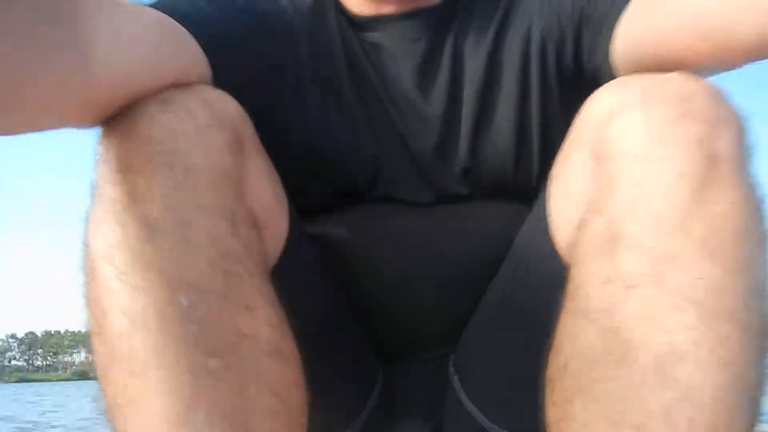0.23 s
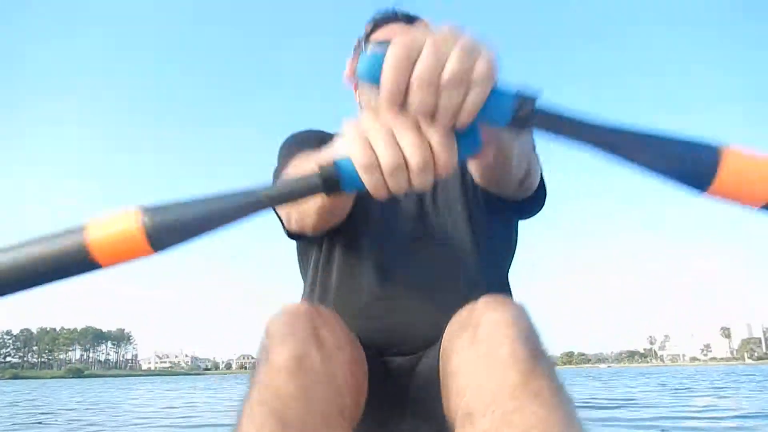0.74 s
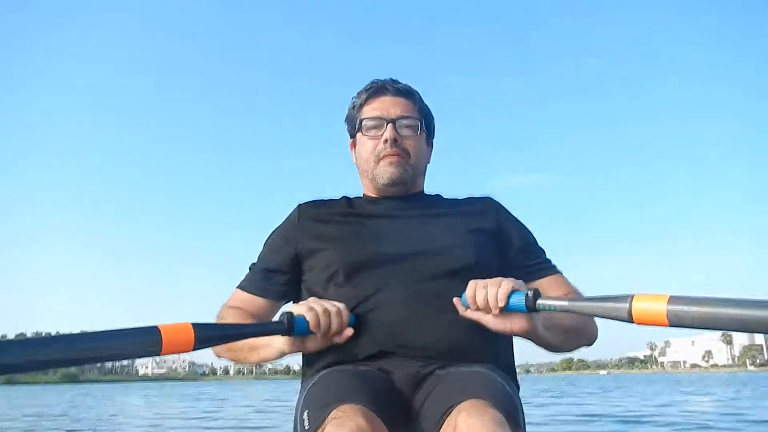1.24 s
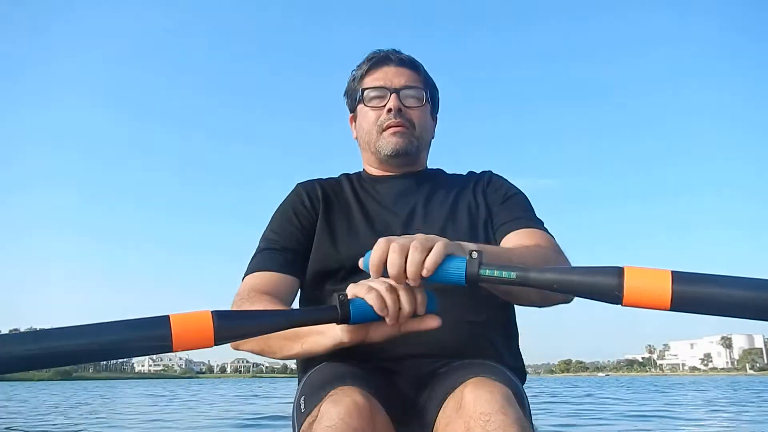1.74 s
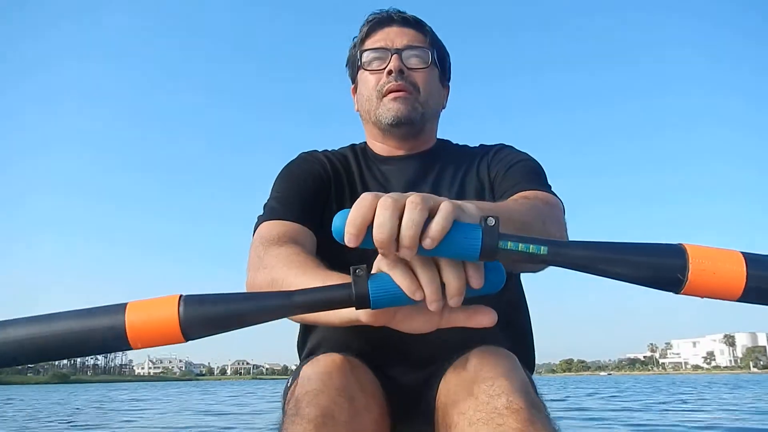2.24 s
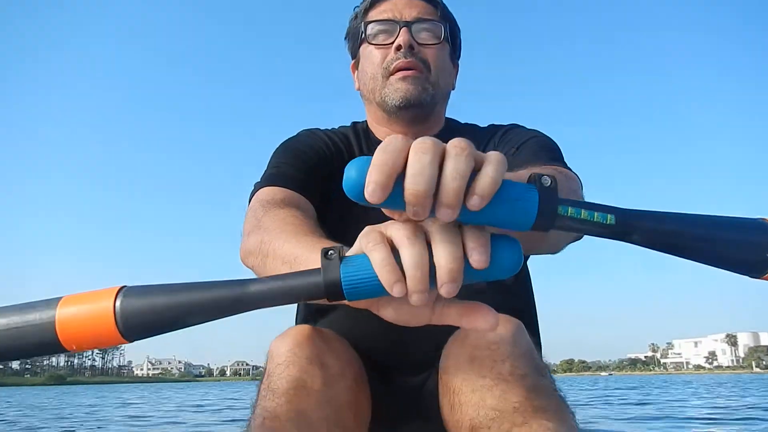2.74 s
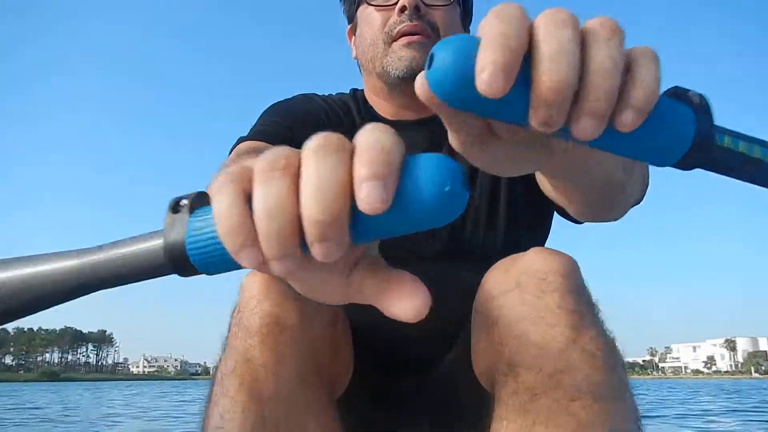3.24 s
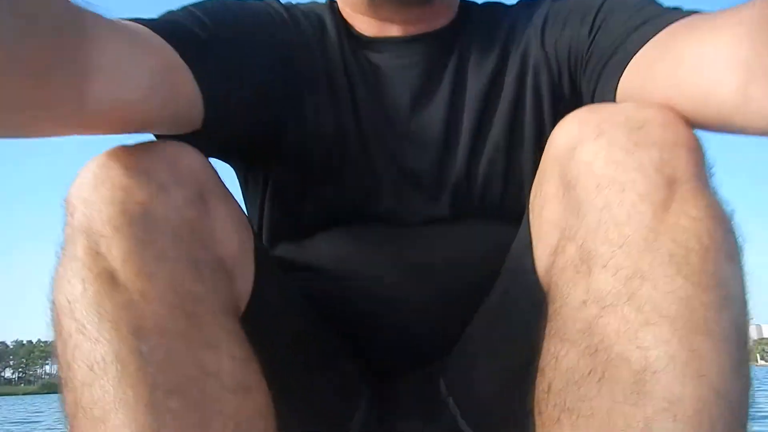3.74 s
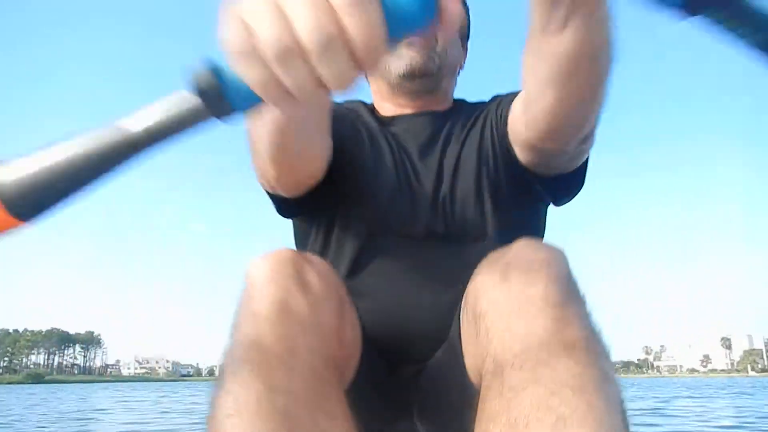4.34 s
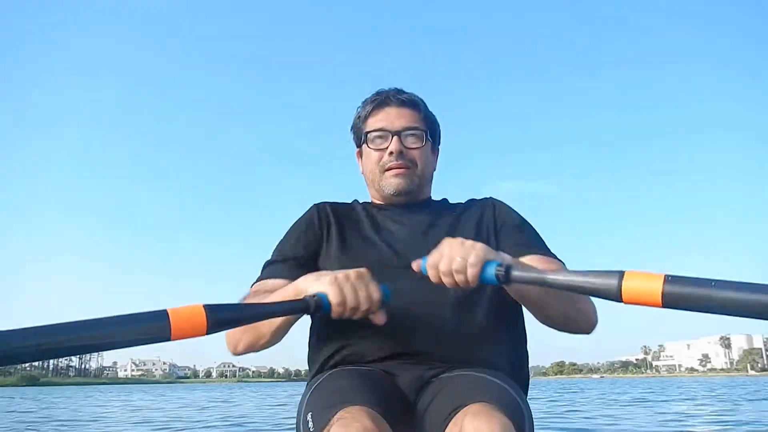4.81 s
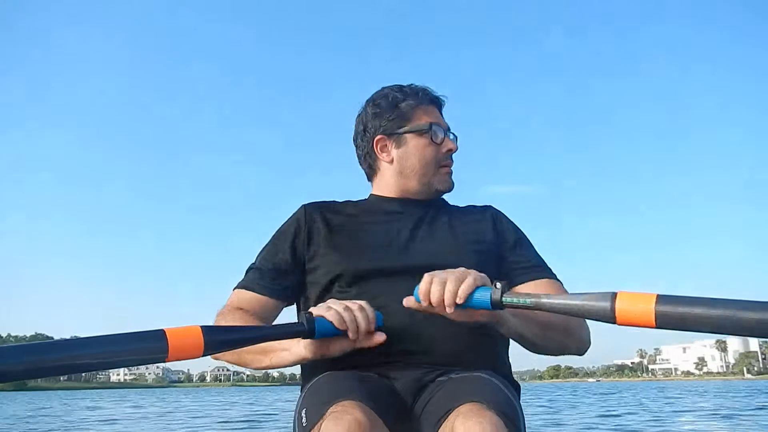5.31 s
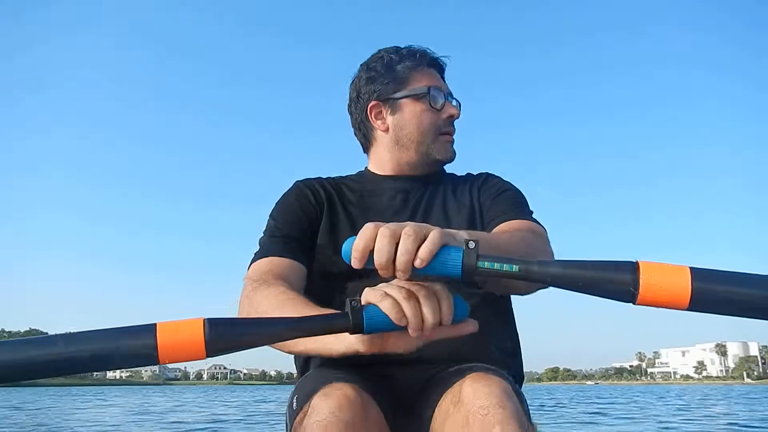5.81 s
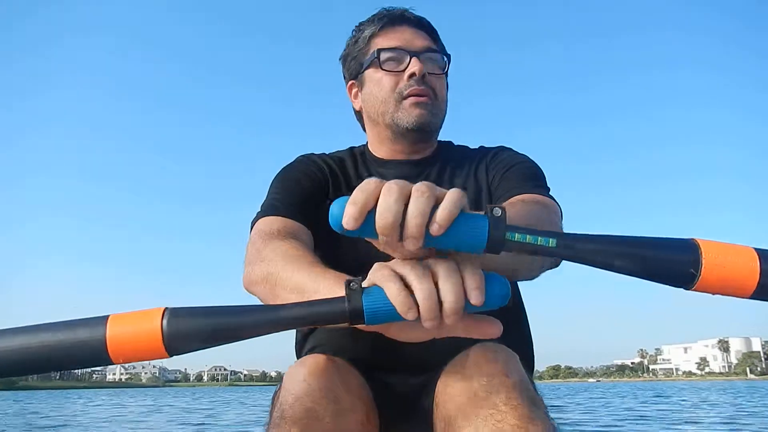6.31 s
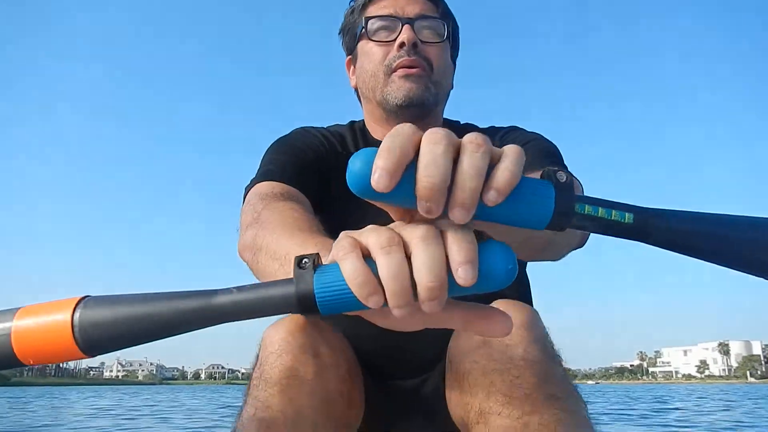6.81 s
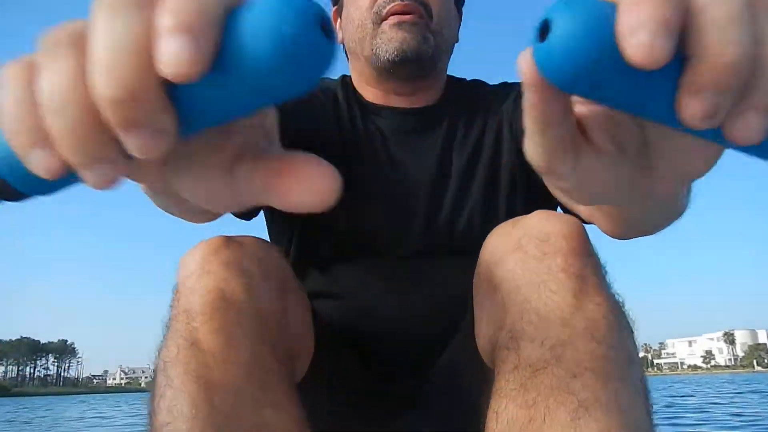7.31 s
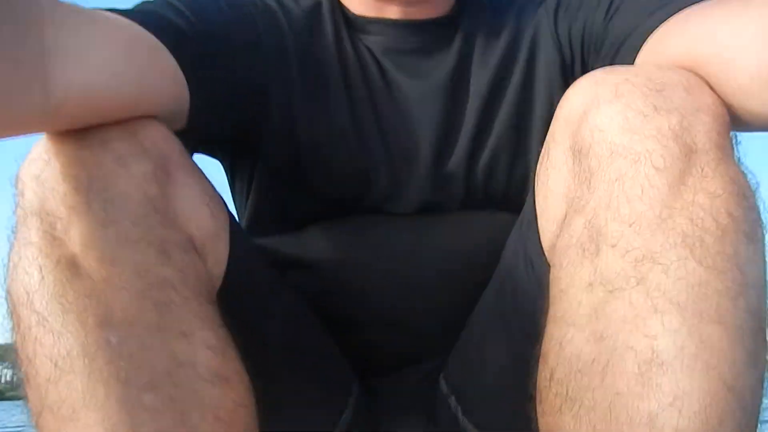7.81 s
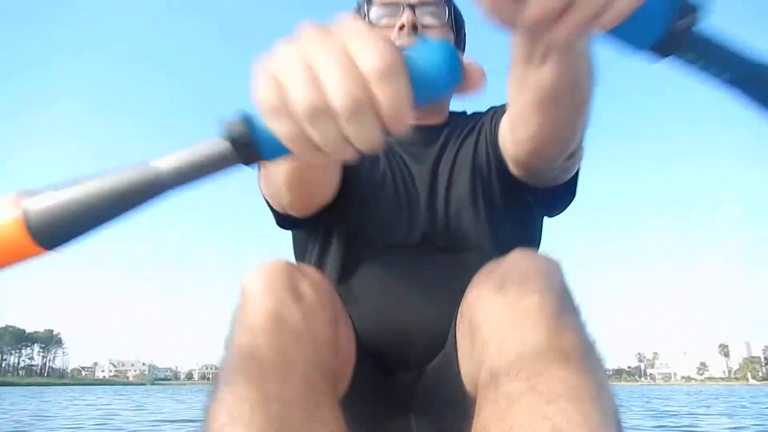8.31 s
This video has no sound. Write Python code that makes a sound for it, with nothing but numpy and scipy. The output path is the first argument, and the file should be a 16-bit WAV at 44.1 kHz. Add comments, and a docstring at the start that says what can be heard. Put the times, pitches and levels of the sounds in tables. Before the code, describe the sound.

Close on-boat rowing: plopping catches, knocking oarlocks, swelling watery wash, low hull gulps, then a quiet glide with light blade hisses.

```python
"""On calm open water, a single scull is rowed, heard from a camera fixed to the hull.
Catches and finishes stir swells of wash: shaped noise and many tiny ringing bubbles.
The blades plop (air pockets that sink in pitch), hiss over or through the water, and drip with short pings.
The hollow hull booms and gurgles as waves slap under it: low wobbling tones with larger gulping bubbles.
The oars scrape and clack in their locks (noise, clicks and ringing tones), with an odd woody tock."""
import sys
import numpy as np
from scipy import signal
from scipy.fft import rfft, irfft
from scipy.io import wavfile

SR = 44100
rng = np.random.default_rng(int(sys.argv[2]) if len(sys.argv) > 2 else 0)


def unload_wav(signal):
    """Save mono or channel-first audio to the path in sys.argv[1] as 16-bit WAV at rate SR, clipped to [-1, 1]."""
    wavfile.write(
        sys.argv[1],
        SR,
        np.round(np.clip(np.atleast_2d(signal).T, -1, 1) * 32767).astype(np.int16),
    )


N = 377055  # length in samples

# Table levels are relative: each layer is also given its own level where it is mixed.


def amp(db):
    """Turns decibels into gain."""
    return 10 ** (np.asarray(db) / 20)


def unit(x):
    """Scales a signal to rms 1."""
    return x / np.sqrt(np.mean(x ** 2) + 1e-20)


def read(points, hz):
    """Reads between the points of a table along a log-frequency axis."""
    f, value = np.transpose(points)
    return np.interp(np.log(hz + 1), np.log(f + 1), value)


def add(mix, s, sound):
    """Mixes in a sound at time s; what falls outside the mix is cut off."""
    at = round(s * SR)
    sound = sound[..., max(-at, 0):]
    part = mix[..., max(at, 0):][..., :sound.shape[-1]]
    part += sound[..., :part.shape[-1]]


def drift(rate_hz, size):
    """Makes a smooth random wander of rms 1 that moves at about the given rate."""
    hz = np.fft.rfftfreq(size, 1 / SR)
    slow = rfft(rng.standard_normal(size)) / (1 + (hz / rate_hz) ** 4)
    return unit(irfft(slow, size))


def colour(x, spectrum, size=4096):
    """Gives a sound the tone of a spectrum, with a causal filter of unit energy."""
    log_gain = np.log(amp(read(spectrum, abs(np.fft.fftfreq(size, 1 / SR)))))
    response = np.exp(np.conj(signal.hilbert(log_gain)))  # the phase that puts the energy early
    taps = np.fft.ifft(response).real[:size // 2]
    return signal.oaconvolve(x, taps[None] / np.linalg.norm(taps), axes=1)[:, :N]


# how alike the noise is at the two microphone ports: f/Hz, likeness (0-1)
LIKENESS = [(30, 0.5), (100, .85), (350, 1), (900, 0.92), (2000, 0.9), (3000, 0.36), (9000, 0.18)]


def grains(clump_db, clump_hz):
    """Clumped noise at two ports, alike in the bass and partly unrelated in the treble."""
    same = np.clip(read(LIKENESS, np.fft.rfftfreq(N, 1 / SR)), -1, 1)
    mid, side = rfft(rng.standard_normal((2, N))) * np.sqrt([1 + same, 1 - same])
    noise = irfft([mid + side, mid - side], N)
    clumps = amp(clump_db * np.minimum(drift(clump_hz, N), 2))
    return unit(noise * clumps)


def burst(t, rise, t60):
    """A soft start and an exponential decay, with peak 1."""
    shape = (1 - np.exp(-(t / rise) ** 2)) * np.exp(-np.log(1000) * t / max(t60, .005))
    return shape / shape.max()


def envelope(times, levels_db, t60s, rise):
    """The joint strength of a row of dying bursts, whose powers add."""
    power, t = np.zeros(N), np.arange(SR // 2) / SR
    for s, db, t60 in zip(times, levels_db, np.broadcast_to(t60s, len(times))):
        add(power, s, (amp(db) * burst(t, rise, t60)) ** 2)
    return np.sqrt(power)


def cavity(hz, t60, rise, bend, settle, rough, rough_hz):
    """A pocket of air rings; its pitch starts off by the share bend and wobbles as its shape changes."""
    t = np.arange(SR // 2) / SR
    wobble = rough * drift(rough_hz, len(t))
    pitch = hz * (1 + bend * np.exp(-t / settle) + wobble)
    return burst(t, rise, t60) * np.sin(2 * np.pi * np.cumsum(pitch) / SR)


def ring(modes, rise, detune):
    """One blow makes a body ring at several pitches, each slightly and randomly off."""
    t = np.arange(SR // 4) / SR
    out = np.zeros(len(t))
    for (hz, db, t60), off in zip(modes, rng.standard_normal(len(modes))):
        tone = np.sin(2 * np.pi * hz * (1 + detune * off) * t)
        out += amp(db) * burst(t, rise, t60) * tone
    return out


def bubbles(per_s, low_hz, high_hz, cycles, spread_db, apart_db, count=24):
    """Small bubbles of many sizes ring briefly at random times, unequally strong on the two sides."""
    out = np.zeros((2, N))
    for hz in np.geomspace(low_hz, high_hz, count):
        age = np.arange(SR // 20) / SR * hz / cycles
        ping = np.sin(2 * np.pi * cycles * age) * age * np.exp(-2 * age)
        at = np.flatnonzero(rng.random(N) < per_s / count / SR)
        shared_db = spread_db * np.minimum(rng.exponential(1, len(at)), 2)
        side_db = apart_db * rng.standard_normal((2, len(at)))
        sizes = np.zeros((2, N))
        sizes[:, at] = amp(shared_db + side_db)
        out += signal.oaconvolve(sizes, ping[None], axes=1)[:, :N]
    return unit(out)


def reflect(x, echo_db, count=7):
    """Deck, rigger and rower throw back a few very short echoes, different at each port."""
    out = x.copy()
    for side in range(2):
        delays_s = rng.uniform(0.00074, 0.0099, count)
        for delay, sign in zip(delays_s, rng.choice([-1, 1], count)):
            add(out[side], delay, sign * amp(echo_db) * x[side])
    return out


# the blades go in: t/s, run-in level/dB (how fast the hull runs), drive level/dB (how hard the pull)
CATCHES = [(0.035, 4, -0.5), (3.812, -1, -12.5), (7.775, -0.5, -2)]
# the blades come out: t/s, release level/dB (how hard they boil up), settle level/dB (the hull sinking)
FINISHES = [(1.223, -0.5, -4.5), (5.019, 0, -2)]
# Four swells of wash, each one row: peak after its cue t/s, rise (dB/s), fall (dB/s),
# gurgle level/dB, churn level/dB, spray level/dB, rumble level/dB
RUN_IN = (0.12, 21, 203, -26.5, -33.5, -42, -29.5)  # the hull runs faster as the rower slides up to the catch
DRIVE = (0.68, 55, 48.5, -30, -34, -49, -57)  # after the catch the blades pull
RELEASE = (0.1248, 31, 35, -26, -27.5, -39, -34)  # the blades boil up to the surface at the finish
SETTLE = (1.13, 5, 52, -37.5, -40, -49, -35)  # after the finish the hull sinks back
# the quiet glide under them: gurgle level/dB, churn level/dB, spray level/dB, rumble level/dB
GLIDE = (-49, -49.5, -61.5, -43)


def stroke_swells(t):
    """Strength of gurgle, churn, spray and rumble: the swells of all strokes on top of the glide."""
    power = amp(GLIDE)[:, None] ** 2 * np.ones(len(t))
    for cues, leading, following in ((CATCHES, RUN_IN, DRIVE), (FINISHES, RELEASE, SETTLE)):
        for cue, leading_db, following_db in cues:
            for swell, db in ((leading, leading_db), (following, following_db)):
                delay, rise, fall, *levels_db = swell
                age = t - cue - delay
                shape_db = np.minimum(rise * age, -fall * age)
                power += np.outer(amp(levels_db), amp(db + shape_db)) ** 2
    return np.sqrt(power)


# tone of the rumbling shell: f/Hz, level/dB
RUMBLE = [(20, -29), (50, -12.5), (78, -5), (98, 1), (120, -4.5), (165, -7), (230, -14.5), (500, -51.5),
          (2000, -56.5)]
# tone of gurgling water: f/Hz, level/dB
GURGLE = [(100, -21.5), (250, -24), (345, 1), (460, 0), (580, -15), (900, -19.5), (3000, -74)]
# tone of churning or torn water, also used by blades(): f/Hz, level/dB
CHURN = [(250, -10.5), (550, -1.5), (800, -1.5), (1150, 0.5), (1450, -4), (2000, -5.5), (3000, -11),
         (6000, -23.5), (9000, -86)]
# tone of fine spray, also used by blades(): f/Hz, level/dB
SPRAY = [(700, -18.5), (1800, 2), (2800, -7), (3700, 4), (5200, 0), (6300, -4), (7400, -20.5), (10000, -26),
         (15000, -28.5)]


def water():
    """Water along the boat: rumble of the shell, gurgle, churning bubbles and fine spray."""
    gurgle, churn, spray, rumble = stroke_swells(np.arange(N) / SR)
    lapping = amp(1.5 * drift(rate_hz=35, size=N))  # ripples make churn and spray noise surge together
    out = amp(2.5) * colour(rumble * grains(clump_db=3.5, clump_hz=22), RUMBLE)
    out += amp(-1.0) * colour(gurgle * grains(clump_db=2.0, clump_hz=44.7), GURGLE)
    out += amp(-4.0) * colour(lapping * churn * grains(clump_db=1.5, clump_hz=90), CHURN)
    out += amp(-0.5) * colour(lapping * spray * grains(clump_db=3.5, clump_hz=178), SPRAY)
    # bubbles follow the same swells: middling in the churn, low in the gurgle, high in the spray
    wet = bubbles(per_s=300, low_hz=550, high_hz=1800, cycles=5, spread_db=3.5, apart_db=2)
    out += amp(-5.0) * churn * wet
    deep = bubbles(per_s=30, low_hz=300, high_hz=529, cycles=4.5, spread_db=1.0, apart_db=2.5)
    out += amp(-6) * gurgle * deep
    fizz = bubbles(per_s=160, low_hz=2400, high_hz=5700, cycles=11, spread_db=8, apart_db=2)
    return out + amp(-4.0) * spray * fizz


def hiss():
    """Faint steady hiss of the microphones: noise that is unrelated on the two sides."""
    noise = rng.standard_normal((2, N))
    return amp(-69.5) * colour(noise, [(100, -11), (9000, 2), (13500, -5), (16000, -11)])


# a blade hisses over or through the water, from a short skim to a longer wash:
# t/s, spray level/dB, torn-water level/dB, time to fall 60 dB (t60/s)
BLADE_HISSES = [(0.016, -30, -19.5, 0.27), (0.289, -28, -29, 0.29), (0.44, -34.5, -30, 0.61),
                (1.627, -30, -31.5, 0.86), (1.718, -26, -23, .16), (1.8, -24, -21, 0.12),
                (1.846, -29.5, -29, 0.58), (2.534, -22.5, -37, 0.079), (2.578, -24.5, -30, 0.16),
                (2.789, -19, -24, 0.16), (3.049, -27, -40, 0.23), (3.112, -25, -42, 0.09),
                (3.152, -27.5, -46, 0.24), (3.209, -33.5, -48, 0.72), (3.42, -28, -36, 0.05),
                (3.467, -26, -55, 0.11), (3.538, -24.5, -38, 0.12), (3.571, -25, -37, 0.14),
                (3.719, -21, -49, 0.12), (4.104, -26, -23.5, 0.18), (4.25, -40.5, -32, 0.38),
                (5.223, -21.5, -42, 0.065), (5.766, -30, -31.5, 0.24), (6.158, -22, -24, 0.13),
                (6.491, -24, -37, 0.047), (6.654, -22, -24, 0.096), (7.21, -19, -45, 0.098),
                (7.478, -21.5, -24, 0.26), (7.755, -32, -28, 0.15), (8.189, -36, -27.5, 0.64)]
# a blade slaps the water and shuts a pocket of air; plops() plays the pockets, blades() the splash:
# t/s, plop level/dB, starting f/Hz, left minus right level/dB, spray level/dB, lesser bubbles level/dB
PLOPS = [(0.032, -4, 993, -2, -26, -20), (0.047, -4.5, 797, -1, -26, -22), (0.066, -15, 830, -6, -39, -21),
         (0.099, -7.5, 715, -5, -22.5, -26), (0.123, -13, 807, -5, -37, -29),
         (0.16, -17.5, 826, -11, -47, -29), (1.005, -20, 716, 3, -37, -26), (1.026, -13, 1110, 1, -42, -26),
         (1.124, -13.5, 946, -3, -22.5, -18), (1.224, -4, 1130, -7.5, -20, -26),
         (1.33, -9, 903, -3.5, -42, -29), (1.553, -19.5, 915, 2, -33, -39),
         (3.812, -4, 843, -4, -27.5, -30), (3.832, -9, 850, 9, -19, -24),
         (3.8545, -10, 800, -4, -26.5, -28), (3.914, -11, 780, -4, -27, -24),
         (3.943, -16, 917, -1, -29, -38), (3.966, -21.5, 770, -4, -40, -47),
         (4.021, -13.5, 788, -4, -41, -35), (4.084, -24, 1190, 2, -53, -24),
         (4.847, -20.5, 1110, 2, -36, -26.5), (4.906, -19, 800, -10, -26, -22),
         (4.946, -27, 1000, -2, -26.5, -27), (5.019, -6.5, 927, -3.5, -23.5, -38),
         (5.134, -22, 710, -5, -34, -44), (5.246, -20, 850, -4, -41, -46), (5.35, -19.5, 800, 0, -24, -30),
         (5.724, -21.5, 1018, 2, -31.5, -39), (5.919, -18, 930, -1, -19, -28),
         (7.7763, -1.5, 1000, -3.5, -28.5, -40), (7.835, -11.5, 760, -5, -26.5, -39),
         (7.858, -18.5, 713, -5, -36, -40), (8.016, -22, 785, -4, -31, -31)]


def blades():
    """A blade grazes the water, smacks it, and throws hissing spray and pinging droplets over torn water."""
    splash_t60, torn_db = 0.15, -2  # (s), (dB relative to the mean of plop and spray levels)
    slaps = [(s, spray_db, (plop_db + spray_db) / 2 + torn_db, splash_t60)
             for s, plop_db, _, _, spray_db, _ in PLOPS]
    s, spray_db, torn_levels_db, t60s = np.transpose(slaps + BLADE_HISSES)
    fine = colour(grains(clump_db=5.5, clump_hz=350), SPRAY)
    droplets = bubbles(per_s=370, low_hz=2297, high_hz=6090, cycles=10.0, spread_db=2.5, apart_db=8)
    spray = amp(-1.0) * fine + amp(-5.0) * droplets
    thrown = envelope(s, spray_db, t60s, rise=0.00081)
    t = np.arange(SR // 4) / SR
    graze = amp(-7.5) * burst(t, 0.0006, t60=0.086)[::-1]  # grows up to the smack
    contact = np.zeros((2, N))
    for start, db in zip(s, spray_db):
        add(thrown, start - t[-1], amp(db) * graze)
        contact[:, round((start + .002) * SR)] = amp(db + 15.5)  # the flat of the blade meets the water
    smack = amp(1.0) * envelope(s, torn_levels_db, t60s=0.014, rise=0.00034)
    tearing = envelope(s, torn_levels_db, t60s, rise=0.0026)
    torn = colour(grains(clump_db=3.0, clump_hz=195) * (smack + tearing), CHURN)
    splash = reflect(spray * thrown + colour(contact, SPRAY), echo_db=-11.5)
    return amp(-8.5) * splash + amp(-5.0) * torn


def pocket(hz):
    """A shut pocket of air starts bright and drops in pitch as it spreads; its upper tone dies first."""
    low_hz, sink_s = 450, 0.01045  # the pitch it drops to (Hz), and how soon (s)
    t60 = 61 / hz  # it dies away in 61 cycles of its starting pitch
    t = np.arange(SR // 8) / SR
    falling = low_hz + (hz - low_hz) * np.exp(-(t / sink_s) ** 3)
    pitch = falling * (1 + 0.072 * drift(340, len(t)))
    turns = 2 * np.pi * np.cumsum(pitch) / SR
    main = burst(t, 0.0012, t60) * np.sin(turns)
    upper = burst(t, 0.00089, t60 / 2) * np.sin(1.3 * turns)
    return main + amp(-8.5) * upper


# a wave meets the hollow hull, which booms, while a large bubble gulps beside it;
# hull() plays the booms, and shell() rings with the gulps:
# t/s, boom level/dB, boom f/Hz, gulp level/dB
WAVES = [(0.036, -10.5, 92.8, -5), (0.112, -20, 179, -6.5), (0.147, -21.5, 160.6, -9.5),
         (0.298, -21, 90, -16), (1.006, -23.5, 132, -11), (1.123, -12, 128, -12.5), (1.252, -5, 92, -4.5),
         (1.364, -10.5, 102.6, -12.5), (1.436, -18, 98.3, -19), (1.619, -16, 110, -23),
         (1.684, -16, 112.2, -14.5), (1.74, -15, 91.4, -17), (1.839, -13.5, 99, -18.5),
         (1.984, -24.5, 115.5, -46), (2.788, -21, 105.3, -26), (2.856, -25.5, 127.4, -23.5),
         (2.923, -18.5, 145, -18.5), (3.291, -27, 92, -38), (3.606, -31, 92, -18.5), (3.818, -9, 104, -8),
         (3.88, -13.5, 159, -9.5), (3.961, -15.5, 100, -14.5), (4.059, -14.5, 103.5, -20),
         (4.9, -12, 138.2, -5.5), (4.972, -21, 126, -12.5), (5.027, -3, 96, -3), (5.106, -29, 123, -11),
         (5.14, -16, 113.3, -4.5), (5.25, -10, 100, -22), (5.35, -17.5, 111.4, -17),
         (5.612, -16, 108.5, -26.5), (5.729, -19.5, 104, -21.5), (5.934, -15.5, 92, -19),
         (6.173, -23.5, 147, -18.5), (6.211, -25, 109.6, -17.5), (6.669, -20, 106.4, -29),
         (7.394, -20, 150.6, -40), (7.476, -14.5, 105.4, -27), (7.664, -18, 91.2, -9.5),
         (7.787, -17, 162.6, -11), (7.85, -19.5, 125, -15), (8.03, -18, 93.5, -17), (8.37, -31, 116.5, -28)]


def plops():
    """Slaps close small air pockets, which sink in pitch; waves shut larger ones that gulp lower and longer."""
    small, large = np.zeros((2, N)), np.zeros(N)
    for s, db, hz, pan_db, *_ in PLOPS:
        place = amp([[db + pan_db / 2], [db - pan_db / 2]])
        add(small, s, place * pocket(hz))
    for s, _, _, db in WAVES:
        gulp = cavity(364.5, t60=0.12, rise=0.0017, bend=0.1, settle=0.0067, rough=0.13, rough_hz=126)
        add(large, s, amp(db) * gulp)
    # each slap breaks up into a short cloud of lesser bubbles
    s, *_, db = np.transpose(PLOPS)
    cloud = bubbles(per_s=400, low_hz=393, high_hz=1394, cycles=3.0, spread_db=2, apart_db=2.5)
    cloud *= envelope(s, db, t60s=0.21, rise=0.014)
    return amp(-4.5) * reflect(small, echo_db=-15.5) + amp(-4.5) * large + amp(-2.5) * cloud


def hull():
    """A wave under the shell gives a low boom with a shorter overtone, choked as the water closes again."""
    out, t = np.zeros((2, N)), np.arange(SR // 2) / SR
    t60 = 0.62  # how long the boom would ring without the choke (s)
    choke = np.exp(-(t / 0.11) ** 3)
    for (s, db, hz, _), lean_db in zip(WAVES, rng.normal(0, 2.2, len(WAVES))):
        boom = cavity(hz, t60, rise=0.0028, bend=0.13, settle=0.0055, rough=0.074, rough_hz=40.7)
        overtone = cavity(hz * 1.7, t60 / 2, rise=0.0083, bend=0.24, settle=0.0067, rough=0.15, rough_hz=66.6)
        place = amp([[db + lean_db], [db - lean_db]])
        add(out, s, place * choke * (boom + amp(-11.0) * overtone))
    return amp(-3.5) * out


# ringing tones of rigger and hull, also used by oarlocks(): f/Hz, level/dB, time to fall 60 dB (t60/s)
RIGGER = [(367.5, -2, 0.14), (455, -2.5, 0.09), (543, -12, 0.15), (861, -12, 0.048)]


def shell():
    """Waves reach the thin hull about 4 ms after their gulps begin and leave it ringing."""
    out = np.zeros(N)
    for s, _, _, db in WAVES:
        add(out, s + 0.00399, amp(db - 13.5) * ring(RIGGER, rise=0.0052, detune=0.045))
    return out


# a drop from a blade pings on the water: t/s, level/dB, f/Hz
DRIPS = [(0.1, -17.5, 4080), (0.474, -29, 3800), (1.074, -24, 1960), (1.152, -21, 3530), (1.241, -24, 5200),
         (1.271, -25, 2100), (1.85, -22, 3610), (3.052, -21.5, 3410), (3.127, -25, 3940),
         (3.326, -30, 5000), (3.544, -24.5, 2060), (5.036, -19, 2130), (5.16, -21.5, 1910),
         (5.184, -23, 4920), (6.497, -26.5, 2100), (7.787, -25, 2100)]


def drips():
    """Drops run off the blades; each traps a tiny bubble whose pitch rises as it surfaces."""
    out = np.zeros((2, N))
    for (s, db, hz), lean_db in zip(DRIPS, rng.normal(0, 3.0, len(DRIPS))):
        ping = cavity(hz, t60=0.018, rise=0.00059, bend=-0.052, settle=0.0031, rough=0.11, rough_hz=1500)
        add(out, s, amp([[db + lean_db], [db - lean_db]]) * ping)
    return amp(0.5) * reflect(out, echo_db=-12.5)


# an oar knocks in its lock: t/s, clack level/dB, rigger and hull ring level/dB
KNOCKS = [(0.3968, -6.5, -11), (0.4006, -11, -13), (0.4086, -11.5, -10), (0.4164, -14.5, -16),
          (0.6595, -27, -22), (0.6924, -16.5, -24), (0.8843, -26, -21), (1.3963, -10, -32),
          (2.086, -18, -16), (2.1305, -19, -20), (2.167, -54, -23.5), (2.211, -25.5, -20),
          (2.922, -32, -31), (4.1968, -7.5, -11), (4.2084, -12, -12.5), (4.2193, -21, -24),
          (4.4138, -18, -35), (4.4378, -20.5, -17.5), (4.745, -33, -15), (6.012, -33, -24),
          (6.083, -35, -25.5), (6.167, -12, -44), (6.866, -35, -23.5), (8.1178, -7, -8.5),
          (8.1426, -10.5, -9), (8.1519, -15.5, -19), (8.175, -16.5, -11.5), (8.2811, -25, -15.5),
          (8.294, -9, -15)]
# ringing tones of the hollow oar shaft and its lock: f/Hz, level/dB, time to fall 60 dB (t60/s)
OAR = [(1255, 1, 0.077), (1630, -6.5, 0.14), (1882, -2.5, 0.072), (2837, -5, 0.067), (3880, -3.5, 0.045),
       (4590, -8, 0.055), (4760, -8, .06), (5300, -12, 0.06)]
# tone of a clack, also used by tocks(): f/Hz, level/dB
CLACK = [(150, -27.5), (400, 10.5), (900, -2.5), (1900, -0.5), (2400, -3.5), (2850, -3), (3450, -6),
         (3900, -7), (5300, -9), (6300, -17.5), (7500, -29), (15000, -37)]


def oarlocks(count=4):
    """The sleeve scrapes as the oar turns, falls flat and bounces unevenly; shaft and rigger ring."""
    s, clack_db, ring_db = np.transpose(KNOCKS)
    # heavier blows on the rigger rattle longer: 0.066 s at 0 dB, halved for every 33 dB less
    t60s = 0.066 * 2 ** (ring_db / 33)
    rebound_s = .002  # typical time between bounces
    force = envelope(s, clack_db, t60s, rise=0.00049)
    rigger, contact, shaft = np.zeros(N), np.zeros(N), np.zeros((2, N))
    t = np.arange(SR // 4) / SR
    scrape = amp(-13.5) * burst(t, 0.00042, t60=0.13)[::-1]  # grows up to the blow
    for start, clack, db, t60 in zip(s, clack_db, ring_db, t60s):
        add(force, start - t[-1], amp(clack) * scrape)
        add(rigger, start, amp(db) * ring(RIGGER, rise=0.0011, detune=0.024))
        both_sides = np.array([ring(OAR, rise=0.0005, detune=0.011) for _ in range(2)])
        add(shaft, start, amp(clack) * both_sides)
        add(contact, start, amp([clack]))  # the first hard touch
        for age in np.cumsum(rebound_s * (.5 + rng.random(count))):
            fade = np.exp(-np.log(1000) * age / max(t60, .005))
            add(contact, start + age, amp([clack]) * fade * rng.uniform(-1.3, 1))
    rattle = colour(amp(18.0) * contact + grains(clump_db=1.0, clump_hz=473) * force, CLACK)
    return reflect(amp(-8.0) * rattle, echo_db=-20) + amp(-13) * shaft + amp(-1.5) * rigger


# something hard and hollow is tapped in the boat: t/s, level/dB, f/Hz
TOCKS = [(4.746, -21, 1310), (5.414, -19, 1266), (5.98, -9, 1046)]


def tocks():
    """A dry click sets off a short, hollow, woody tone with a weaker one above it."""
    tone, click, t = np.zeros(N), np.zeros((2, N)), np.arange(SR // 4) / SR
    for s, db, hz in TOCKS:
        turns = 2 * np.pi * hz * t
        tones = np.sin(turns) + amp(-10) * np.sin(1.59 * turns)
        add(tone, s, amp(db) * burst(t, 0.00066, t60=0.028) * tones)
        add(click, s, amp([db + 9.5]))
    return tone + reflect(colour(click, CLACK), echo_db=-7.5)


def scene():
    """Open water adds no echo of its own: all sources are simply summed."""
    return water() + hiss() + blades() + plops() + hull() + shell() + drips() + oarlocks() + tocks()


# tilt between the two microphone ports: f/Hz, left minus right level/dB
PORT_TILT = [(30, 9), (100, -2), (550, -0.5), (790, -5.5), (1150, 1.5), (2200, -1.5), (2850, -4),
             (3550, 4.5), (4250, -3.5), (5500, -1.5), (8500, -2.5), (12000, 0.5)]
# dead spots of the camera's microphone: f/Hz, width (Hz)
NOTCHES = [(2500, 114), (3210, 360), (5005, 3.5)]


def record(dry):
    """The camera's two ports colour and delay the sound differently; then its notches and treble limit."""
    hz = np.fft.rfftfreq(N, 1 / SR)
    right_lag, low_cut_hz, treble_limit_hz = .00003, 52, 15750  # (s, Hz, Hz)
    # half of the tilt and of the lag goes to each port, in opposite directions
    port = amp(read(PORT_TILT, hz) / 2) * np.exp(1j * np.pi * hz * right_lag)
    low_cut = hz / np.hypot(hz, low_cut_hz)
    out = irfft(rfft(dry) * np.array([port, 1 / port]) * low_cut, N)
    for notch_hz, width in NOTCHES:
        out = signal.lfilter(*signal.iirnotch(notch_hz, notch_hz / width, SR), out)
    treble_cut = signal.firwin(511, treble_limit_hz, window=("kaiser", 9), fs=SR)
    return signal.oaconvolve(out, treble_cut[None], "same")


dry = scene()
out = record(dry)
unload_wav(out)
```